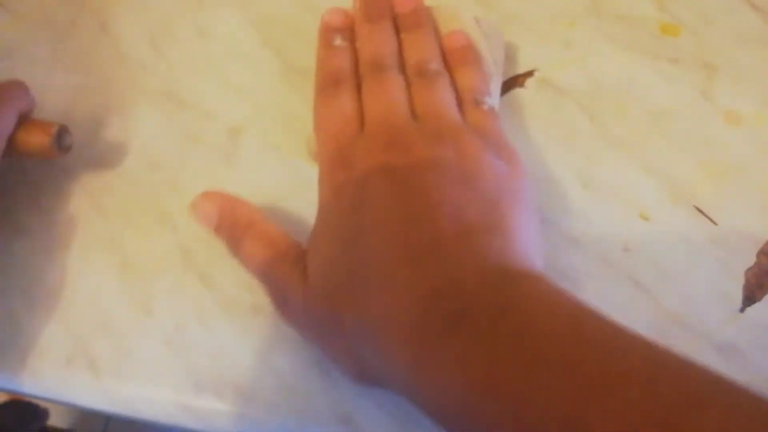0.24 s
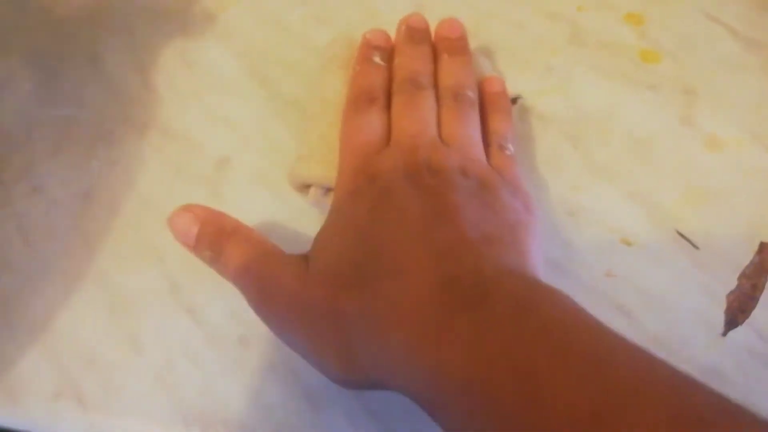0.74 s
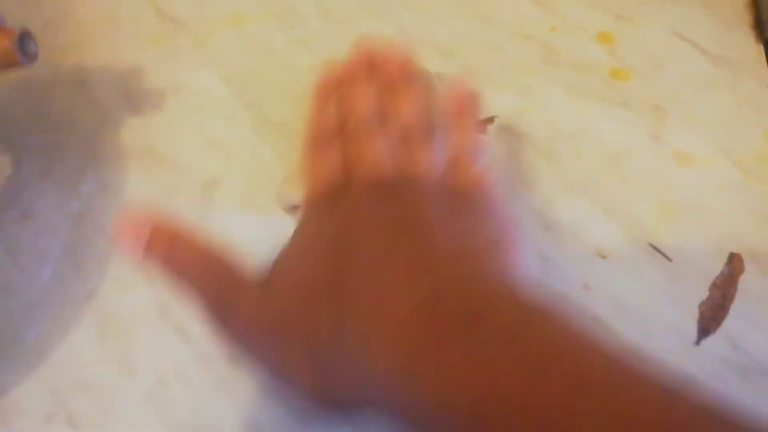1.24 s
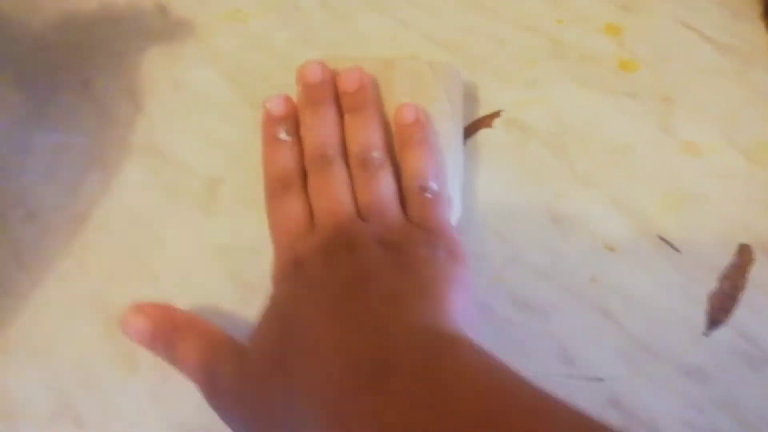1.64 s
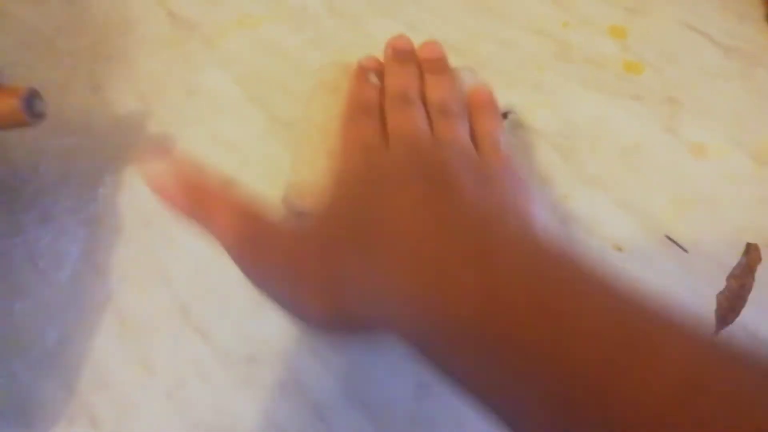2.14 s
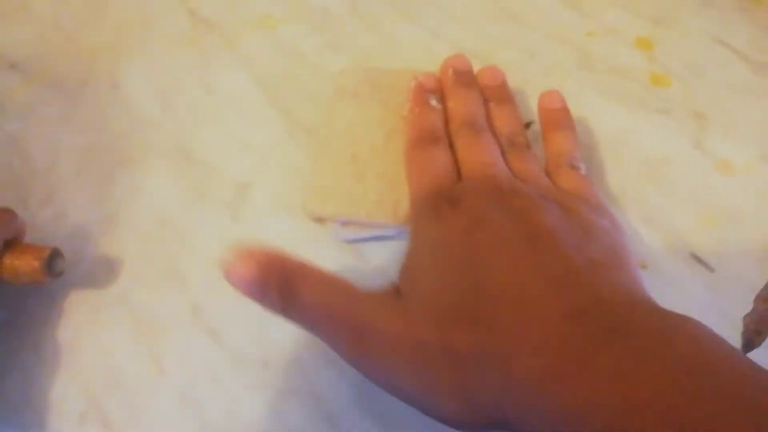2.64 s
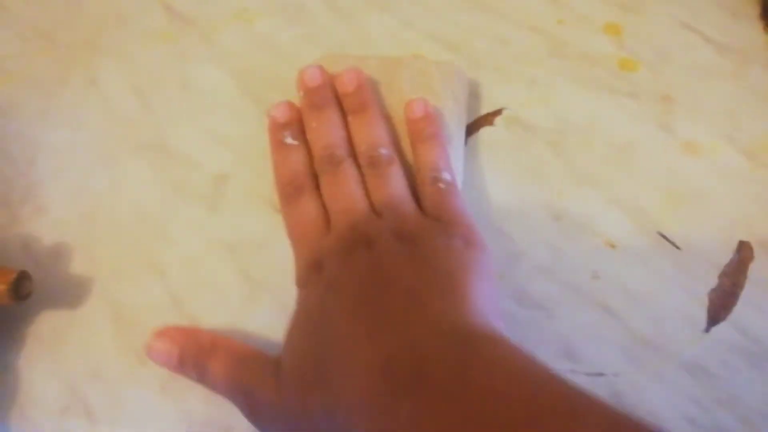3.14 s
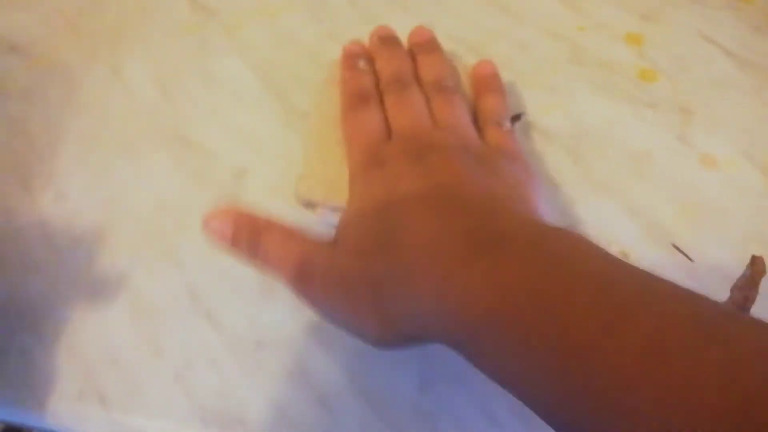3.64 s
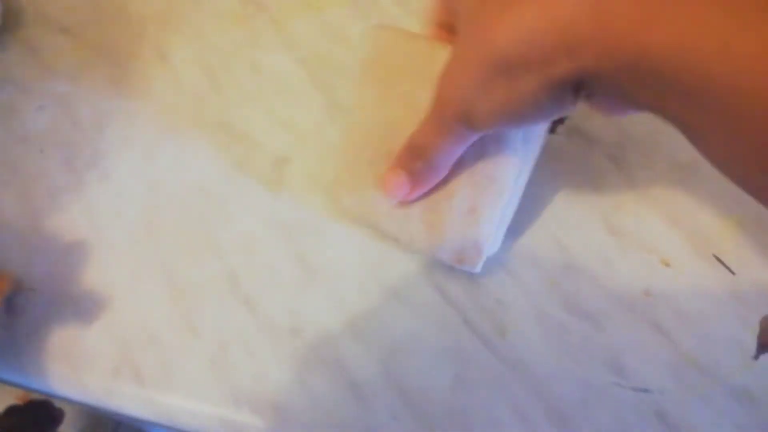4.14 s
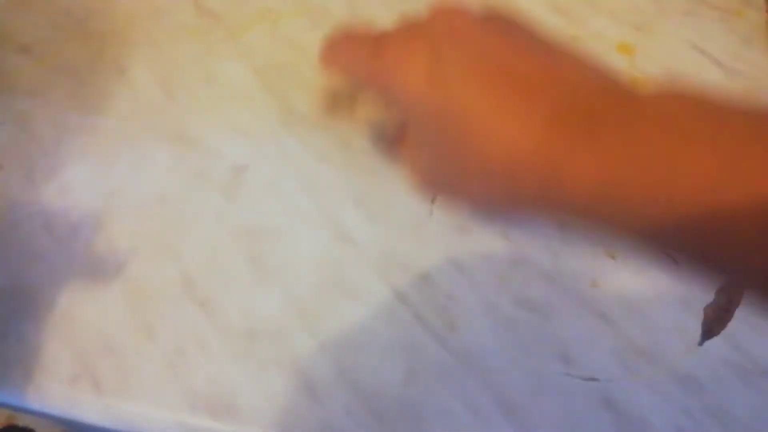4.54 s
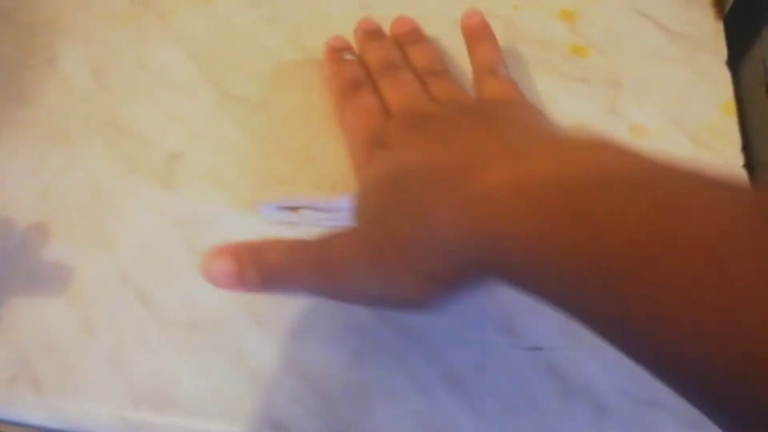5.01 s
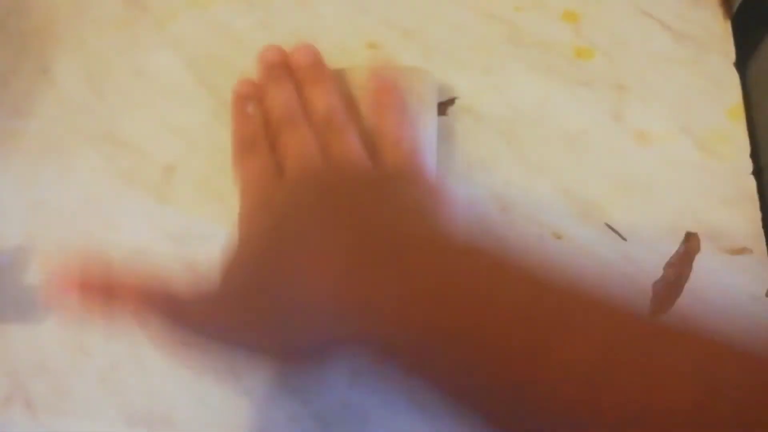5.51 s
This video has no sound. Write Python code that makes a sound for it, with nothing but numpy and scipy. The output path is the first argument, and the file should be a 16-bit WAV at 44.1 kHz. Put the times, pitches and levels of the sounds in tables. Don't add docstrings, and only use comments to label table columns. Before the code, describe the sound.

A hand works dough on a hard kitchen counter: faint taps, two bursts of loud sharp wooden knocks, then dull palm thuds indoors.

```python
import sys
import numpy as np
from scipy import signal
from scipy.io import wavfile

SR = 44100
rng = np.random.default_rng(int(sys.argv[2]) if len(sys.argv) > 2 else 0)


def materialize(psi):
    bounded = np.clip(np.atleast_2d(psi).T, -1, 1)
    quanta = np.round(bounded * 32767).astype(np.int16)
    wavfile.write(sys.argv[1], SR, quanta)


def linear_from_db(decibels):
    return 10 ** (np.asarray(decibels, float) / 20)


N = 254475

# start_s, tip_tick_db, wood_knock_db, extra_depth_db
TAPS = [(0.827, -40.5, -43, 6), (0.899, -33.5, -39, -2), (1.259, -51.5, -57, 0), (1.8532, -29, -9.5, -2.5),
        (2.094, -42.5, -42, 0.5), (2.515, -29.5, -14.5, 4.5), (2.532, -24, -8.5, -5.5),
        (3.029, -52, -59, 6), (3.33, -52.5, -69, -4.5), (3.528, -50, -43.5, -2), (4.236, -51.5, -72, 12),
        (4.623, -44.5, -41.5, 6.5), (5.496, -45.5, -50, -6), (5.508, -48.5, -61, 6.5)]
TAP_BANDS_HZ = [320, 1000, 2800, 8000]
TICK_COLOUR_DB = [-22, -10, -2.5, -3]
WOOD_COLOUR_DB = [-5, -0.5, -16, -29]
TAP_PULSE_DB = -2.5
# start_s, peak_db
BLOWS = [
    (1.8546, 0),
    (2.5152, -11),
    (2.5324, 1),
]
HEAVY_DB = -28
# start_s, heel_pulse_db, body_db, edge_db, heel_delay_s
THUDS = [
    (1.108, -12.5, -30, -23.5, 0.0031),
    (1.752, -44, -29, -36.5, 0.0032),
    (4.065, -10, -24, -16.5, .0049),
    (4.412, -20, -25.5, -18, 0.0037),
    (4.819, -31, -25.5, -28, 0.00444),
    (5.147, -36.5, -25.5, -31, 0.0039),
]
THUD_BANDS_HZ = [320, 730, 1600, 5500]
SLAP_UNDER_EDGE_DB, CRACK_DB, CRACK_FOLLOWS = 16, -34.5, .75
# pitch_hz, level_db, t60_s
TAP_MODES = [(275, -9, 0.24), (315, -4.5, 0.12), (356.4, -5, 0.27), (385.7, -2, 0.27), (460, -11.5, 0.17),
             (668, -7.5, 0.19), (830, -3, 0.13), (910, -8.5, .2), (1080, -8.5, 0.16), (1260, -11.5, .2),
             (1356, -9.5, .2), (1460, -11, 0.22), (2107, -6.5, .15), (3400, -10, 0.088)]
THUD_MODES = [(196.9, -7.5, 0.1), (245, -10.5, 0.42), (275, -6.5, 0.48), (340, 2.5, .3), (385, 2.5, 0.19),
              (428.5, -4.5, 0.23), (502, 0, 0.19), (563, -7.5, 0.1), (738, 1, 0.062), (926, -6, 0.21),
              (1049, -12.5, .25), (1384, -1.5, 0.22), (1550, -1.5, 0.17), (1950, -8, 0.22)]
# start_s, pitch_hz, level_db
PINGS = [(.1, 387, -49), (.148, 2280, -50), (1.107, 385, -31), (1.11, 720, -16), (1.108, 1456, -28.5),
         (1.111, 2860, -44), (1.756, 320, -52), (1.856, 979, -6), (1.856, 763, -6), (1.857, 315, -17),
         (2.096, 3700, -55), (2.516, 3370, -24.5), (2.535, 379, -11.5), (2.534, 1035, -33),
         (3.528, 4840, -48), (4.067, 344.3, -19), (4.067, 738, -26), (4.415, 406, -19.5),
         (4.415, 318.4, -19), (4.626, 1845, -46), (4.82, 389, -26.5), (4.82, 243.5, -28.5),
         (4.818, 1950, -44), (4.82, 523, -38), (5.147, 347, -22), (5.147, 275, -33.5), (5.148, 1390, -44),
         (5.148, 1990, -53)]
PING_T60_S, PING_T60_HZ, PING_DAMPING = .2, 350, 0.93
# start_s, level_db
DISH_RINGS = [
    (0.898, -48),
    (2.11, -51),
    (5.5, -60.5),
]
DISH_HZ, DISH_T60_S = 1595, .22
# start_s, pitch_hz, level_db, t60_s
TOOL_NOTES = [
    (.831, 950, -45, .13),
    (.9, 930, -43, .14),
    (3.5285, 950, -44, .13),
    (2.098, 1000, -48, .1),
    (3.43, 400, -43, .12),
]
LEFT_LEAD_S, ECHO_AFTER_S = 0.00061, .002

# start_s, boom_db, sway_db
PRESSES = [(0.145, -63, -51), (0.818, -38, -28), (1.107, -40.5, -58), (1.252, -43, -44), (1.75, -38, -69.5),
           (1.853, -31.5, -48.5), (2.515, -55, -49), (2.531, -36.5, -41.5), (3.025, -51.5, -47),
           (3.328, -63.5, -74.5), (3.429, -58, -76.5), (3.594, -53, -47.5), (3.646, -58, -59.5),
           (4.064, -42.5, -53), (4.409, -42, -78), (4.622, -42.5, -39), (4.817, -40, -43),
           (5.146, -43, -45), (5.496, -48, -64.5), (5.549, -53, -65.5)]
# pitch_hz, level_db, t60_s
CABINET = [
    [(38.4, 2.5, 0.26), (47.2, -11, 0.24)],
    [(76.2, -2.5, 0.33), (85, 3.5, 0.76)],
    [(116, -3.5, 0.6), (136.3, 4, 0.56), (176.6, -8, 0.48)],
]
PANEL_BY_PRESS_DB, PANEL_BY_TAP_DB, PANEL_BY_THUD_DB = -10, -13, -15

# start_s, length_s, level_db
BRUSHES = [(1.613, 0.21, -65), (1.73, 0.24, -63), (2.37, 0.057, -68), (3.328, .07, -66),
           (3.785, .06, -65.5), (3.883, 0.14, -62), (4.045, 0.14, -59.5), (4.415, .07, -63)]
SLIDES = [(2.42, 0.14, -59), (4.44, .1, -62.5), (4.5, 0.13, -54.5), (4.7, 0.094, -61), (5.72, 0.062, -69)]
SKIDS = [(.828, 0.23, -60), (0.895, 0.13, -55.5), (2.093, 0.15, -58), (3.528, 0.16, -56),
         (4.622, 0.086, -59)]
CREAKS = [(.001, .17, -65), (1.32, .11, -67.5), (1.806, .15, -58.5), (4.863, .15, -62.5)]
SQUASHES = [(.089, 0.06, -57), (.14, .17, -70), (.424, 0.11, -72), (3.408, 0.095, -47.5)]
RUBS = [(.143, .03, -67.5), (.405, 0.12, -63), (1.41, 0.091, -61.5), (2.407, 0.17, -58.5),
        (3.041, 0.075, -72.5), (3.399, .12, -57.5), (3.874, 0.2, -62.5), (4.616, 0.023, -57.5),
        (5.418, .089, -61.5), (5.499, .052, -64)]
# start_s, length_s, level_db
SNAPS = [
    (.828, 0.019, -47.5),
    (3.526, 0.013, -50.5),
    (4.822, 0.021, -65.5),
]
# centre_hz, width_octaves, swell (under 1 peaks early)
BRUSH, SLIDE, SKID = (9600, .8, .45), (8000, 3.1, 1.3), (8800, 0.63, 0.31)
CREAK, SQUASH, RUB = (3200, .65, .6), (370, 0.64, 0.59), (1700, 1.5, 0.96)
SNAP = (10300, 0.41, 0.4)
SKID_LOW, SKID_LOW_DB = (2050, 1, 0.48), -0.5
SCUFF, UNDER_SCUFF = (2050, .16, .78), (1420, .1, .78)
LONG_RUB_S, SCUFF_AFTER_S, SCUFF_S, SCUFF_DB, UNDER_SCUFF_DB = .088, 0.012, 0.054, -0.5, -10

# band_hz, t60_s
ROOM_T60 = [(150, .5), (300, 0.5617), (700, 0.54), (1500, .5), (3000, 0.58), (6000, 0.3755),
            (12000, 0.3553)]
# band_hz, level_db
TAIL_COLOUR = [(150, -5.5), (250, -5), (400, 2), (560, -4), (900, -0.5), (1500, 2), (2200, -3), (3500, -3),
               (5000, -3.5), (9000, -1), (11500, -6), (13500, -19), (15000, -36)]
# band_hz, likeness (1 is the same)
LIKENESS = [(60, 0.96), (130, 0.93), (290, 0.58), (640, -0.25), (1410, 0.26), (3100, -0.06), (6820, 0.03),
            (15000, 0.13)]
# band_hz, level_db
CONTACT_BALANCE = [(60, 1), (180, -1), (550, 2.5), (1650, 6), (4970, 3.5), (15000, 12)]
FLOOR_BALANCE = [(60, -1), (180, 1), (550, -1), (1650, 4.5), (4970, 2), (15000, 10.5)]
# band_hz, level_db (per Hz)
FLOOR = [(13, -34), (22, -8.5), (76, 3), (95, -6.5), (184, -13), (387, -14.5), (469, -23), (602, -20),
         (1410, -22.5), (1620, -23), (5030, -24.5), (6100, -28), (9480, -27.5), (14300, -35), (16000, -53)]
FLOOR_DB = -60.5
EDGES_HZ = 22 * 2 ** np.arange(0, 9.6, 1 / 3)
GUESS_OVER_FLOOR, GUESS_OF_TAPS, GUESS_OF_THUDS, GUESS_FORGETS_S = 7, 0.0071, .0012, 1.2
# pitch_hz, level_db
WHINES = [
    (9350, -81),
    (11500, -88.5),
    (13800, -92),
]


def at_hz(points, hz):
    table_hz, values = np.transpose(points)
    return np.interp(np.log(hz), np.log(table_hz), values)


def clicks(times, sizes):
    out = np.full(N, 1e-18)
    places = np.clip(np.round(np.asarray(times) * SR).astype(int), 0, N - 1)
    np.add.at(out, places, sizes)
    return out


def ring(x, hz, t60):
    r, w = linear_from_db(-60 / (t60 * SR)), 2 * np.pi * hz / SR
    return signal.lfilter([0, np.sin(w)], [1, -2 * r * np.cos(w), r * r], x)


def lag(x, seconds):
    r = np.exp(-1 / (seconds * SR))
    return signal.lfilter([1 - r], [1, -r], x)


def dying(power, t60):
    return signal.lfilter([1], [1, -linear_from_db(-120 / (t60 * SR))], power)


def drift(rate):
    knots = rng.standard_normal(int(N / SR * rate) + 3)
    return np.interp(np.arange(N) * rate / SR, np.arange(len(knots)), knots)


def sides(balance, hz):
    return linear_from_db(at_hz(balance, hz) / 2 * np.array([[1], [-1]]))


def contact_db(rows, bands_hz, hz):
    return np.array([at_hz(list(zip(bands_hz, row[2:])), hz) for row in rows])


def counter():
    out = (tap_pulses() + thud_pulses()) * linear_from_db([[2], [-3]]) + pings(tones())
    out += struck_modes(tap_levels(), TAP_BANDS_HZ, TAP_MODES)
    out += struck_modes(thud_levels(), THUD_BANDS_HZ, THUD_MODES)
    out[1] = np.roll(out[1], round(LEFT_LEAD_S * SR))
    out += pings(TOOL_NOTES)
    return signal.sosfilt(signal.butter(2, 160, "high", fs=SR, output="sos"), out)


def tap_pulses():
    light = [tuple(row[:2]) for row in tap_levels() if row[3] < HEAVY_DB]
    s, peak_db = np.transpose(light + BLOWS)
    return 2.2 * ring(lag(clicks(s, -linear_from_db(peak_db)), .0001), 850, .006)


def thud_pulses():
    s, heel_db, _, edge_db, delay_s = np.transpose(THUDS)
    push = clicks(s + delay_s, linear_from_db(heel_db)) - clicks(s, linear_from_db(edge_db))
    return 2.5 * ring(lag(push, .00015), 600, .005)


def tap_levels():
    s, tick, wood, depth = np.transpose(TAPS)
    tick_db = tick[:, None] + TICK_COLOUR_DB
    wood_db = wood[:, None] + WOOD_COLOUR_DB + np.outer(depth, np.arange(4) == 0)
    power = linear_from_db(2 * wood_db) + linear_from_db(2 * tick_db)
    return np.column_stack([s, tick + TAP_PULSE_DB, 10 * np.log10(power)])


def thud_levels():
    s, heel, body, edge, _ = np.transpose(THUDS)
    slap, crack = edge - SLAP_UNDER_EDGE_DB, CRACK_DB + CRACK_FOLLOWS * edge
    return np.column_stack([s, heel, body, edge, slap, crack])


def struck_modes(rows, bands_hz, modes):
    out, times = np.zeros((2, N)), np.array(rows)[:, 0] + ECHO_AFTER_S
    for hz, level_db, t60 in modes:
        chance = rng.normal(0, 1, (len(rows), 3))
        strike_db = contact_db(rows, bands_hz, hz) + level_db - 6.5
        for side in range(2):
            sizes = np.sign(chance[:, 2]) * linear_from_db(strike_db + 3.1 * chance[:, side])
            out[side] += ring(clicks(times, sizes), hz, t60)
    return out


def tones():
    hollow = [(s, hz, db, PING_T60_S * (PING_T60_HZ / hz) ** PING_DAMPING) for s, hz, db in PINGS]
    return hollow + [(s, DISH_HZ, db, DISH_T60_S) for s, db in DISH_RINGS]


def pings(table):
    out = np.zeros((2, N + SR))
    t = np.arange(SR // 2) / SR
    for start, hz, level_db, t60 in table:
        first = round(start * SR)
        build_up = -np.expm1(-t * hz / 1.5)
        tone = linear_from_db(level_db - 60 * t / t60) * build_up * np.sin(2 * np.pi * hz * t)
        out[:, first:first + len(t)] += sides(CONTACT_BALANCE, hz) * tone
    return out[:, :N]


def presses():
    s, boom, sway = np.transpose(PRESSES)
    taps, thuds, out = tap_levels(), thud_levels(), 0
    panel_s = np.concatenate([s, taps[:, 0], thuds[:, 0]])
    panel = np.concatenate([boom + PANEL_BY_PRESS_DB, taps[:, 2] + PANEL_BY_TAP_DB,
                            thuds[:, 2:4].mean(axis=1) + PANEL_BY_THUD_DB])
    # start, level, softness in seconds and direction of the push for each group
    pushes = [(s, sway, .002, 1), (s, boom, .002, -1), (panel_s, panel, .001, -1)]
    for group, (times, push_db, soft_s, sign) in zip(CABINET, pushes):
        for hz, level_db, t60 in group:
            uneven_db = rng.normal(0, 4.4, len(times))
            push = clicks(times, sign * linear_from_db(push_db + level_db + 3.0 + uneven_db))
            out = out + ring(lag(lag(push, soft_s), soft_s), hz, t60)
    return out


def rustle():
    out, white = np.zeros((2, N + SR)), rng.standard_normal((2, N + SR))
    grain = np.append(linear_from_db(0.83 * drift(150)), np.ones(SR))
    for start, length, level_db, hz, octaves, swell in frictions():
        part = slice(round(start * SR), round((start + length) * SR))
        edges = np.minimum(hz * 2 ** (octaves * np.array([-.5, .5])), 12500)
        band_filter = signal.butter(2, edges, "band", fs=SR, output="sos")
        band = signal.sosfilt(band_filter, white[:, part] * grain[part])
        envelope = np.sin(np.pi * np.linspace(0, 1, band.shape[1]) ** swell) ** 1.1
        out[:, part] += band / np.std(band) * envelope * linear_from_db(level_db) * sides(FLOOR_BALANCE, hz)
    return out[:, :N]


def frictions():
    long_rubs = [row for row in RUBS if row[1] > LONG_RUB_S]
    scuffs = [(s + SCUFF_AFTER_S, SCUFF_S, db + SCUFF_DB) for s, length, db in long_rubs]
    under = [(s + 2 * SCUFF_AFTER_S, length / 2, db + UNDER_SCUFF_DB) for s, length, db in long_rubs]
    drags = [(s, length, db + SKID_LOW_DB) for s, length, db in SKIDS]
    kinds = [(BRUSHES, BRUSH), (SLIDES, SLIDE), (SKIDS, SKID), (drags, SKID_LOW), (SNAPS, SNAP),
             (CREAKS, CREAK), (SQUASHES, SQUASH), (RUBS, RUB), (scuffs, SCUFF), (under, UNDER_SCUFF)]
    return [(*row, *kind) for rows, kind in kinds for row in rows]


def room_and_air():
    out = 0
    floor_sum = np.sqrt(np.sum(linear_from_db(at_hz(FLOOR, EDGES_HZ[:-1])) ** 2 * EDGES_HZ[:-1]))
    for hz, noise in noise_bands():
        floor = linear_from_db(2 * (FLOOR_DB + at_hz(FLOOR, hz))) * hz / floor_sum ** 2
        colour_db = at_hz(TAIL_COLOUR, hz) - 60 * (hz < 130)
        taps_db = contact_db(tap_levels(), TAP_BANDS_HZ, hz) + colour_db - 15.0
        thuds_db = contact_db(thud_levels(), THUD_BANDS_HZ, hz) + colour_db - 16
        taps = clicks(np.array(TAPS)[:, 0] + ECHO_AFTER_S, linear_from_db(2 * taps_db))
        thuds = clicks(np.array(THUDS)[:, 0], linear_from_db(2 * thuds_db))
        early = dying(3.4 * taps, 0.07) + dying(7.0 * thuds, 0.11)
        early += dying(4.0 * taps + .6 * thuds, 0.0083) * (hz > 1500)
        t60 = at_hz(ROOM_T60, hz)
        tail = dying(taps, t60) + dying(thuds, 0.88 * t60)
        power = lag(early + tail, 2 / hz + 1 / 1000)
        lifted = dying(GUESS_OF_TAPS * taps + GUESS_OF_THUDS * thuds, GUESS_FORGETS_S)
        guess = GUESS_OVER_FLOOR * floor + lifted
        kept = np.maximum(power - guess, 0.05 * power)
        echoes = sides(CONTACT_BALANCE, hz) ** 2 * kept * linear_from_db(4.0 * drift(90))
        around = sides(FLOOR_BALANCE, hz) ** 2 * floor * linear_from_db(3.9 * drift(11.0))
        out = out + noise * np.sqrt(echoes + around)
    return out


def noise_bands():
    white = rng.standard_normal((2, 2, N + SR))
    for k, (low, high) in enumerate(zip(EDGES_HZ, EDGES_HZ[1:])):
        band_filter = signal.butter(2, [low, high], "band", fs=SR, output="sos")
        mid, side = signal.sosfilt(band_filter, white[k % 2])[:, SR:]
        hz = np.sqrt(low * high)
        alike = np.clip(at_hz(LIKENESS, hz), -.99, .99)
        pair = np.sqrt(1 + alike) * mid + np.sqrt(1 - alike) * side * [[1], [-1]]
        yield hz, pair / np.sqrt(np.mean(pair ** 2))


def whines():
    t, out = np.arange(N) / SR, 0
    for hz, level_db in WHINES:
        wander = np.cumsum(35 * drift(90)) / SR
        out = out + linear_from_db(level_db + 2 * drift(15)) * np.sin(2 * np.pi * (hz * t + wander))
    return out


def scene():
    return counter() + presses() + rustle() + room_and_air() + whines()


def band_limit(x):
    return signal.sosfilt(signal.butter(12, 16370, fs=SR, output="sos"), x)


def record(dry):
    rumble_cut = signal.butter(2, 30, "high", fs=SR, output="sos")
    top_cut = signal.cheby2(10, 60, 16500, fs=SR, output="sos")
    rounded = 1.15 * np.tanh(signal.sosfilt(rumble_cut, dry) / 1.128)
    return band_limit(signal.sosfilt(top_cut, rounded))


dry = scene()
out = record(dry)
materialize(out)
```